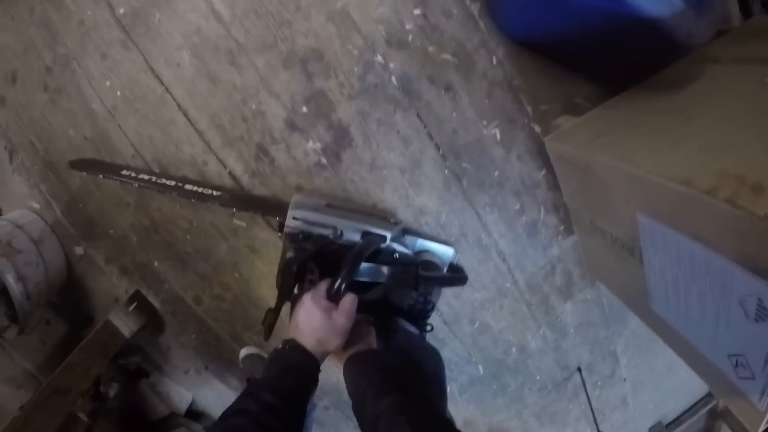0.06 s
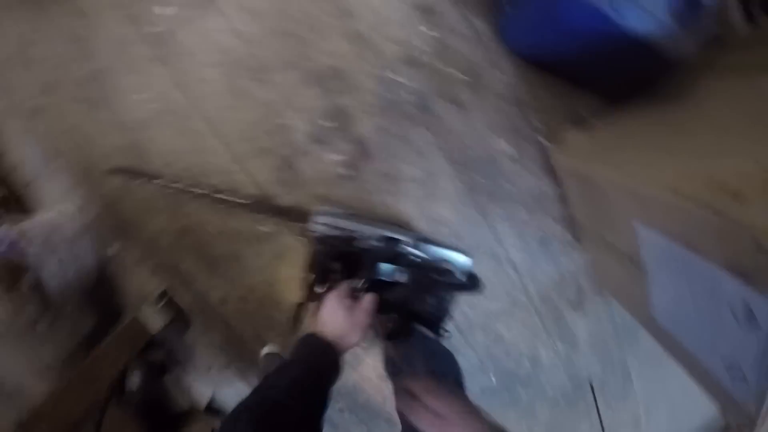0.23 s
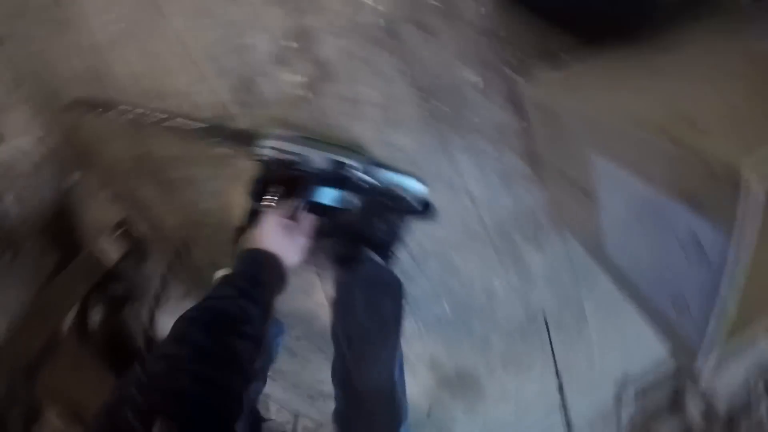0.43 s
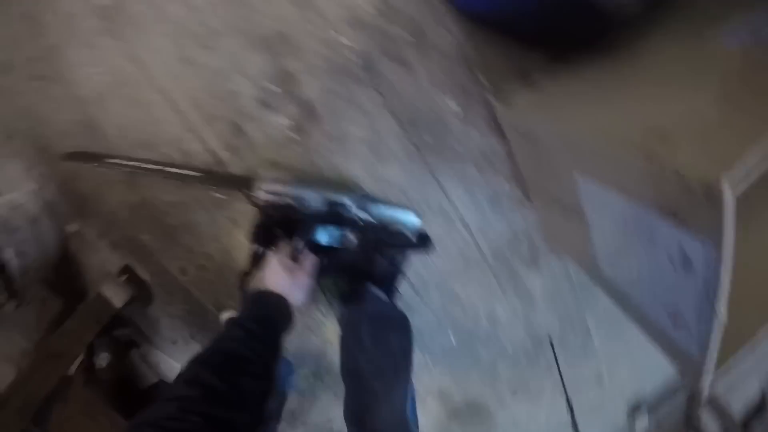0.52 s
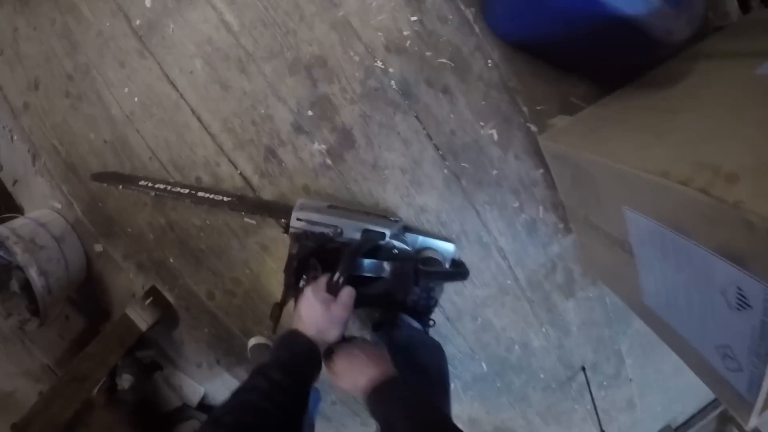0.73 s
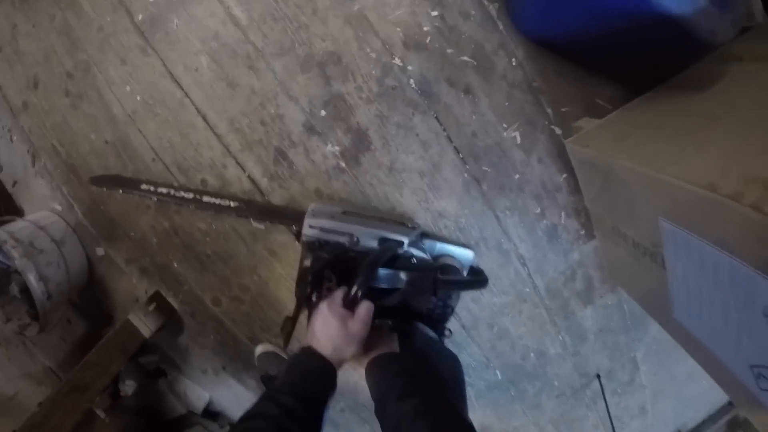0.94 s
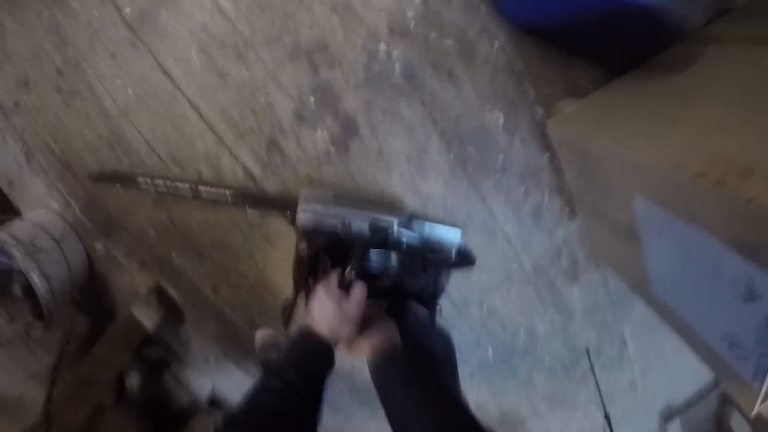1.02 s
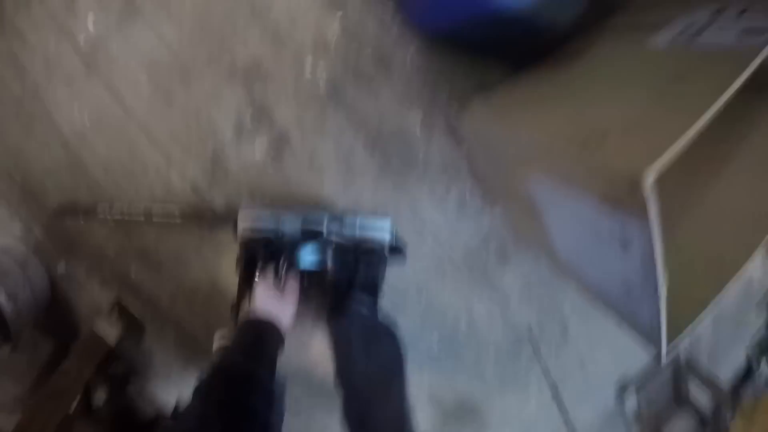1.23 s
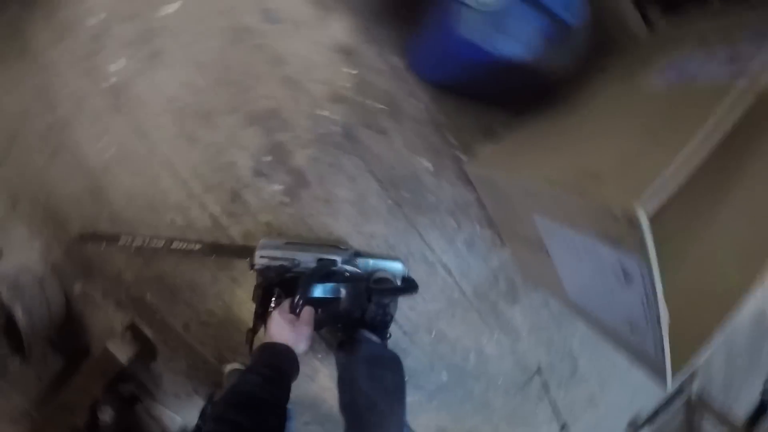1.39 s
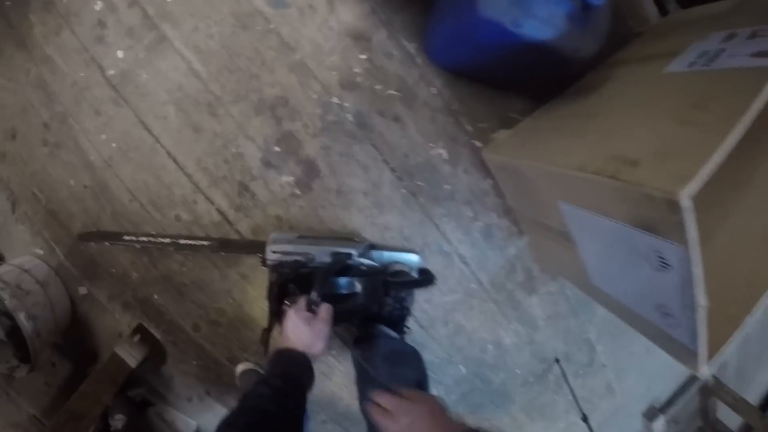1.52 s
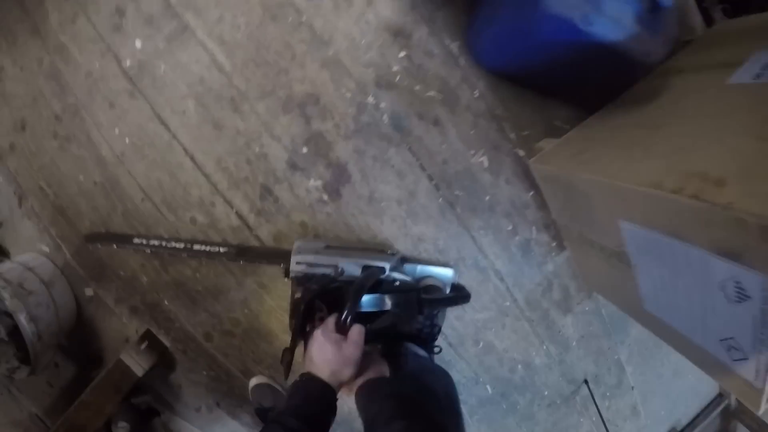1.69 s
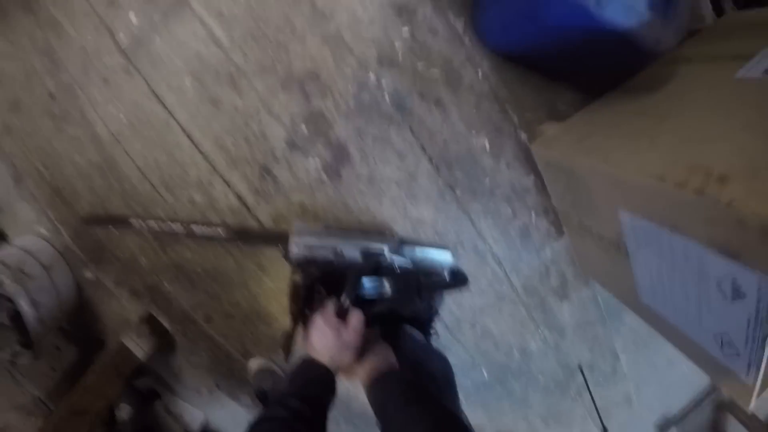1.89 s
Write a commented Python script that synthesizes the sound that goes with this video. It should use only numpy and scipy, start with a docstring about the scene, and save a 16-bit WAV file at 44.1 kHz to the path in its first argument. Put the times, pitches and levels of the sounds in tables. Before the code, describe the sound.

A chainsaw is pulled on its recoil starter and fails to catch. After faint clicks, the first pull surges at about 0.3 seconds, hollow puffs and plank boom, then sharp rattling clacks at 0.6-0.75. A quieter gap follows. The second pull starts near 1.1, chugs through 1.4, and ends in dense metallic clatter until 1.7, fading into quiet barn air. Close, with a short room tail.

```python
"""Chainsaw that will not catch

A chainsaw on a barn's plank floor is pulled twice on its recoil starter and turns over without catching.
Uneven puffs drive muffler resonances with a hiss of air; wavering notes and a rumble boom from the planks.
Starter pawls, chain and bar clack as gritty noise bursts and ring in beating steel modes as the cord
runs out and back. A tiny part jingles, the barn answers with a short tail, and quiet air lies beneath."""
import sys
import numpy as np
from scipy import signal
from scipy.fft import rfft, irfft, next_fast_len
from scipy.io import wavfile
from scipy.ndimage import uniform_filter1d, map_coordinates

SR = 44100
rng = np.random.default_rng(int(sys.argv[2]) if len(sys.argv) > 2 else 0)


def to_wav(sig):
    """Store sig (one row per channel, or 1-D mono) as 16-bit WAV at the path in sys.argv[1].

    Samples outside -1..1 are clipped; the rate is SR.
    """
    pcm = np.clip(np.atleast_2d(sig), -1, 1) * 32767
    pcm = np.round(pcm).astype(np.int16)
    wavfile.write(sys.argv[1], SR, pcm.T)  # frames by channels


N = 85995

# Resonances of the muffler and case. Each row: centre in Hz, width in Hz, relative level in dB.
MUFFLER = [(431, 33.5, -5.5), (511.2, 17.2, -1), (552.7, 25.3, -2), (617, 30.6, -3.5), (667.5, 31.7, -3),
           (742.5, 87, -12), (858, 26, -15.5), (1074, 180, -23.5)]
# Clacks of pawls, chain and bar. Each row: start in seconds, level in dB, case knock over the rattle in dB,
# treble over the rattle in dB, rattle t60 in seconds, rise in seconds, then the ringing of the low, middle
# and high steel modes over the clack, each in dB.
CLACKS = [(0.069, -39, 11, -28, 0.04, 0.00057, -24, -24, -25),
          (0.1969, -20, -4, -20, 0.069, 0.0028, -60, -50, -26),
          (0.2638, -41, -5, -27, 0.078, 0.0015, -32, -36, -30),
          (0.273, -31, 3, -29, 0.21, 0.0021, -26, -31, -32),
          (0.2854, -36, -3, -29, 0.034, 0.0013, -33, -37, -26),
          (0.2911, -15.5, 9.5, -36, 0.041, 0.00072, -40, -42, -38),
          (0.37, -29, -6, -23, 0.11, 0.0012, -30, -22, -19),
          (0.411, -16.5, 14.5, -29, 0.052, 0.0026, -37, -25, -23),
          (0.4646, -30, 7, -20, 0.058, 0.0022, -27, -22, -11),
          (0.5029, -15.5, 5, -16, 0.076, 0.0012, -35, -25, -20),
          (0.5694, -36, -15, -33, 0.05, 0.0018, -26, -31, -30),
          (0.629, -8.5, -18, -25, 0.055, 0.0015, -26, -20.5, -15),
          (0.6518, -8.5, -15, -10, 0.072, 0.0017, -23, -18.5, -19),
          (0.6729, -11.5, -4.5, -16, 0.11, 0.00085, -16, -46, -21),
          (0.6962, -9.5, -4, -9, 0.038, 0.001, -37, -26, -17),
          (0.7194, -20.5, -8, -2.5, 0.069, 0.0015, -4, -24, -9),
          (0.7337, -21.5, -13, -6, 0.16, 0.001, -26, -31, -22),
          (0.9126, -35.5, 7, -33, 0.057, 0.0014, -36, -32, -32),
          (0.9467, -25, -20, -13, 0.084, 0.0013, -40, -21, -24),
          (1.0969, -12, -5, -10.5, 0.088, 0.0012, -31, -33, -19),
          (1.1777, -26, 1, -39, 0.2, 0.0013, -32, -42, -38),
          (1.2725, -20.5, -12, -32, 0.14, 0.0013, -18, -28, -29),
          (1.3143, -18.5, 8, -9, 0.047, 0.0017, -26, -20, -22),
          (1.4031, -10.5, 2, -14, 0.062, 0.0022, -18, -32, -23),
          (1.4182, -9.5, -8, -18, 0.073, 0.0011, -33, -19, -21),
          (1.4376, -7, -3, -19, 0.043, 0.0022, -18.5, -38, -21),
          (1.4562, -14.5, -3, -7, 0.083, 0.0013, -15, -31, -22),
          (1.4798, -21, -5, -20, 0.12, 0.0013, -20, -29, -26),
          (1.5474, -24.5, -27, -7, 0.049, 0.0011, -20, -9, -22),
          (1.562, -9.5, 5.5, -18, 0.053, 0.0017, -26, -20, -16),
          (1.5912, -15, 2.5, -9.5, 0.13, 0.0011, -27, -12, -31),
          (1.6193, -17, -16, -7, 0.066, 0.0012, -22, -10.5, -9),
          (1.6489, -13.5, 3, -13.5, 0.056, 0.0023, -18, -18, -16.5),
          (1.68, -21, 0, -10, 0.074, 0.002, -29, -19, -26),
          (1.8637, -34, 6, -21, 0.093, 0.0018, -34, -19, -24),
          (1.915, -40, -12, -27, 0.089, 0.0012, -17.5, -39, -31)]


def amp(db):
    """Decibels to linear gain."""
    return 10 ** (np.asarray(db) / 20)


def unit(x):
    """x scaled to rms 1."""
    return x / np.sqrt(np.mean(x ** 2) + 1e-20)


def along(points, hz):
    """Interpolate (Hz, value) points on a log frequency axis."""
    f, v = np.transpose(points)
    return np.interp(np.log(hz + 1), np.log(f + 1), v)


def curves(rows):
    """One value per sample for each column after the time."""
    s, *cols = np.transpose(rows)
    return [np.interp(np.arange(N) / SR, s, c) for c in cols]


def filtered(x, response):
    """Multiply the spectrum of x by a function of frequency."""
    m = next_fast_len(N + SR // 2)
    return irfft(rfft(x, m) * response(np.fft.rfftfreq(m, 1 / SR)), m)[..., :N]


def resonant(x, peaks):
    """Pass x through parallel resonances of (Hz, width in Hz, dB), alternating in sign."""
    def response(f):
        return sum((-1) ** k * amp(db) * 1j * f * width / (hz * hz - f * f + 1j * f * width)
                   for k, (hz, width, db) in enumerate(peaks))
    return filtered(x, response)


def noise(spectrum):
    """Coloured noise of rms 1."""
    return unit(filtered(rng.standard_normal(N), lambda hz: amp(along(spectrum, hz))))


def pulses(rate, uneven, size_db):
    """Impulses of irregular timing (scatter as a share of the beat) and size."""
    draw = rng.standard_normal((400, 2))
    beat = np.arange(len(draw)) + uneven * draw[:, 0]
    at = (beat / rate * SR).astype(int)
    keep = (at >= 0) & (at < N)
    return np.bincount(at[keep], amp(size_db * draw[keep, 1]), N)


def decay(s, t60, rise):
    """Envelope that starts at s, swells and dies, lasting a third of a second at most."""
    out, start = np.zeros(N), round(s * SR)
    t = np.arange(min(N - start, SR // 3)) / SR
    out[start:start + len(t)] = amp(-60 * t / max(t60, .005)) * (1 - np.exp(-t / rise))
    return out


def wobble(rate):
    """A smooth curve through random knots, rate a second (190 at most)."""
    return map_coordinates(rng.standard_normal(400), [np.arange(N) * min(rate, 190) / SR])


def air():
    """The quiet barn: steady coloured noise."""
    # Each row: frequency in Hz, relative density in dB per Hz.
    air_spectrum = [(88, -39), (150, 3), (243, 5), (549, -27), (858, -7), (3020, -31.5), (14300, -38),
                    (15400, -70)]
    return amp(-53) * noise(air_spectrum)


def barn(x):
    """Each frequency of the barn's answer, a burst of noise, dies at its own speed."""
    # Each row: frequency in Hz, t60 in seconds.
    barn_decay = [(300, 0.25), (2000, 0.62), (10000, 0.37)]
    hz, t, z = signal.stft(rng.standard_normal(SR // 2), SR, nperseg=256)
    fading = z * amp(-60 * t / along(barn_decay, hz)[:, None])
    tail = signal.istft(fading, SR, nperseg=256)[1]
    delayed = np.pad(x, (400, 0))  # samples
    return signal.fftconvolve(delayed, tail / np.linalg.norm(tail))[:N]


def planks():
    """The floor booms under the shaken saw: two wavering notes with a rough skirt, and a rumble."""
    # The hum of the planks. Each row: time in seconds, pitch in Hz, level in dB.
    low_note = [(0.0, 71.3, -44), (0.108, 66, -35), (0.152, 67.5, -44), (0.238, 75.8, -36),
                (0.26, 71.6, -47), (0.304, 74.7, -12.5), (0.374, 77.5, -20), (0.422, 76, -28),
                (0.482, 78.8, -21.5), (0.574, 76.25, -18.5), (0.82, 73.6, -26), (0.938, 71.3, -26.5),
                (0.982, 72.4, -48), (1.14, 72, -24), (1.162, 72.9, -24), (1.21, 73.3, -10.5),
                (1.276, 74.7, -21.5), (1.428, 74.8, -21.5), (1.536, 76.2, -47), (1.606, 78.1, -15.5),
                (1.662, 74.5, -58), (1.704, 76.4, -27), (1.84, 65.9, -26), (1.95, 67.7, -33)]
    high_note = [(0.0, 92, -20.5), (0.064, 102.6, -47), (0.178, 103.4, -42), (0.248, 111.4, -20),
                 (0.33, 127.4, -11.5), (0.358, 116.1, -17.5), (0.438, 112.6, -15.5), (0.542, 107.3, -28.5),
                 (0.58, 107.5, -13), (0.634, 104.2, -28), (0.706, 105.9, -21), (0.744, 103.6, -37),
                 (0.782, 103.8, -17.5), (0.83, 103.2, -37), (0.972, 106.2, -32), (0.998, 104.0, -47),
                 (1.102, 116.5, -58), (1.146, 127, -16), (1.184, 122.9, -12), (1.552, 110.3, -25.5),
                 (1.678, 116.1, -33), (1.726, 112, -26), (1.868, 118, -53.5), (1.95, 118, -43)]
    # Swells of the rumble. Each row: time in seconds, level in dB.
    rumble_level = [(0.0, -31), (0.032, -27), (0.162, -41), (0.26, -20), (0.33, -21), (0.384, -14.5),
                    (0.422, -15.5), (0.63, -25), (0.706, -29), (0.726, -35), (1.058, -34), (1.102, -57),
                    (1.128, -14), (1.248, -29), (1.336, -18), (1.394, -35), (1.432, -14.5), (1.46, -21.5),
                    (1.748, -32.5), (1.758, -43), (1.792, -27), (1.95, -49)]
    # Rumble resonances. Each row: centre in Hz, width in Hz, relative level in dB.
    deep = [(33.4, 5.3, 5.5), (53, 10, 0)]
    wander, fuzz_db = .7, -6  # phase wander in radians; skirt level in dB

    rumble = resonant(resonant(rng.standard_normal(N), deep), [(40.4, 30, 0)])
    out = amp(curves(rumble_level)[0]) * unit(rumble)
    for note in low_note, high_note:
        hz, level_db = curves(note)
        phase = 2 * np.pi * np.cumsum(hz) / SR + wander * wobble(11.58)
        fuzz = amp(fuzz_db) * (wobble(45.15) * np.sin(phase) + wobble(45.2) * np.cos(phase))
        out = out + amp(level_db) * unit(np.sin(phase) + fuzz)
    return out


def jingle():
    """A small loose part shivers at a very high pitch: narrow noise in short bursts."""
    # Each row: start in seconds, level in dB, t60 in seconds.
    jingles = [(0.4404, -34.5, 0.056), (0.46, -43, 0.08), (0.9538, -45, 0.11)]
    shiver = unit(resonant(rng.standard_normal(N), [(13400, 304, 0)]))  # Hz, width in Hz, dB
    return shiver * sum(amp(db - 1.5) * decay(s, t60, .002) for s, db, t60 in jingles)


def steel():
    """Every clack feeds each mode of bar and chain, a beating, wavering pair of sines."""
    # Bar and chain modes. Each row: frequency in Hz, relative level in dB, t60 in seconds.
    modes = [(3588, -4, .27), (4630, -11, .15), (6150, -5, .3), (6690, -8, .2), (9060, -11, .2),
             (9700, -15, .15), (11050, -15, .2), (11750, -18, .12), (13600, -14, .14)]
    # Borders in Hz of the low, middle and high groups of modes.
    split_hz = [4000, 8000]
    scatter_db, flicker_db = 1.5, 3  # each mode rings differently at each clack, and unsteadily
    twin_hz, wander = 18, .045  # beat rate; phase wander in radians per kHz squared

    s, db, *rest = np.transpose(CLACKS)
    groups = rest[-3:]
    luck = rng.standard_normal((len(CLACKS), len(modes)))
    t, out = np.arange(N) / SR, 0
    for (hz, level, t60), scatter in zip(modes, luck.T):
        ring_db = groups[np.searchsorted(split_hz, hz)]
        hits = np.bincount((s * SR).astype(int), amp(db + ring_db + scatter_db * scatter), N)
        # the power of successive hits adds up and dies, then each onset is softened over 200 samples
        fade = signal.lfilter([1], [1, -amp(-120 / (t60 * SR))], hits ** 2) ** .5
        swell = uniform_filter1d(fade, size=200, origin=99)
        phase = 2 * np.pi * hz * t + wander * (hz / 1000) ** 2 * wobble(60)
        twin = np.sin(phase + 2 * np.pi * twin_hz * t + wobble(6))
        pair = np.sin(phase) + .6 * twin
        out = out + amp(level + flicker_db * wobble(30)) * swell * pair
    return out


def clacks():
    """Each clack is a short gritty rattle that knocks the case and wakes its own mix of housing resonances."""
    # Spectra of the rattle and its treble. Each row: frequency in Hz, relative density in dB per Hz.
    clatter = [(530, 6), (900, 7.5), (1190, -7.5), (3350, -6), (4540, -8), (5790, -11), (6320, -11.5),
               (7200, -34), (9360, -34), (15800, -120)]
    treble = [(4000, -28), (6800, -2), (7110, -13), (9380, -7), (12600, -15), (13800, 1), (15400, -20)]
    # Housing resonances. Each row: centre in Hz, width in Hz, relative level in dB.
    housing = [(1177, 237, 1.5), (1528, 93, -8.5), (2371, 91, -4.5), (2780, 240, -4), (5720, 430, -13)]
    housing_db, mix_db = -5.5, 3.5  # housing over the rattle; scatter of its mix
    kick_db, grit_db = 14.5, 2.5  # first blow on the case; grain of the rattle

    out, knocks = np.zeros(N), np.zeros(N)
    mid, top, white = noise(clatter), noise(treble), rng.standard_normal(N)
    grain = unit(uniform_filter1d(rng.standard_normal(N), size=60))
    grit = unit(amp(grit_db * grain))
    voices = np.array([amp(db) * unit(resonant(rng.standard_normal(N), [(hz, width, 0)]))
                       for hz, width, db in housing])
    luck = rng.standard_normal((len(CLACKS), len(housing)))
    for (s, db, case_db, treble_db, t60, rise, *_), scatter in zip(CLACKS, luck):
        rattle = amp(db - 6) * decay(s, t60, max(rise, 1e-4))
        body = amp(housing_db + mix_db * scatter) @ voices
        out += rattle * (grit * (mid + amp(treble_db) * top) + body)
        knocks += amp(case_db) * rattle * white
        knocks[round(s * SR)] += amp(db + case_db + kick_db)
    return out + resonant(knocks, MUFFLER) / np.std(resonant(white, MUFFLER))


def engine():
    """The piston's uneven puffs of air sound the muffler and hiss at the ports."""
    # The engine turning over. Each row: time in seconds, muffler level in dB, low chuff over the muffler
    # in dB, air hiss over the muffler in dB.
    turn = [(0.0, -36, -11, -7.5), (0.07, -50, -40, -13.5), (0.184, -64.5, -16, -9), (0.2, -38.5, -32, -7),
            (0.244, -33.5, 5, -15), (0.304, -11, -2.5, -25.5), (0.346, -17.5, 1, -21),
            (0.466, -18.5, -4, -21.5), (0.554, -26.5, 1.5, -18), (0.574, -23.5, -10, -15),
            (0.602, -37, -7, -11), (0.63, -19, -28, -20), (0.706, -28.5, -20, -9), (0.722, -29, -7, -6),
            (0.906, -43, -19.5, -22), (0.916, -43.5, -41, -20), (1.07, -53, -39, -6.5),
            (1.108, -34.5, -24, -6), (1.14, -25.5, 4, -13), (1.178, -10.5, -22, -31), (1.21, -17, 2, -12.5),
            (1.248, -15, -1.5, -23), (1.368, -20.5, -3, -18), (1.482, -25, -6.5, -31),
            (1.498, -29, -1.5, -11), (1.552, -31, -14, -9), (1.568, -22, -27, -14),
            (1.602, -42.5, -11, 13.5), (1.624, -18, -27, -12), (1.64, -34.5, -16, -1.5),
            (1.662, -24.5, -22, -7.5), (1.7, -34, -18, -9), (1.932, -46.5, -34, -27), (1.95, -48, -2, -20)]
    # Low chuff resonances. Each row: centre in Hz, width in Hz, relative level in dB.
    chuff_peaks = [(190.6, 36, 2.5), (225.3, 32, 0), (256.4, 24, -3.5), (287.7, 34, -4.5)]
    # Spectrum of the air. Each row: frequency in Hz, relative density in dB per Hz.
    hiss_spectrum = [(590, -44), (1000, -34), (1190, -30), (1830, -5), (2230, -4), (4690, -11.5),
                     (8890, -24.5), (13900, -33), (15400, -43)]
    beats_per_s, uneven, size_db = 88, 0.1967, 0.9  # puffs; timing scatter in beats; size scatter
    breath, puff_s = 0.43, 0.0052  # share of noise; time constant of a puff

    level_db, low_db, hiss_db = curves(turn)
    beats = pulses(beats_per_s, uneven, size_db)
    gate = unit(signal.lfilter([1], [1, -np.exp(-1 / (puff_s * SR))], beats))
    drive = (1 - breath) * unit(beats - beats.mean()) + breath * gate * rng.standard_normal(N)

    def sounded(db, peaks):
        """Resonances driven at a changing level, scaled by their answer to the steady drive."""
        return resonant(amp(db) * drive, peaks) / np.std(resonant(drive, peaks))

    puffs = sounded(level_db, MUFFLER)
    chuff = sounded(level_db + low_db, chuff_peaks)
    flutter_db = 1.9 * wobble(69.52) + 4.3 * wobble(170)
    hiss = amp(level_db + hiss_db + flutter_db) * noise(hiss_spectrum)
    return puffs + chuff + hiss


def scene():
    """The saw and the barn's answer to it, over the planks and the quiet air."""
    saw = jingle() + steel() + clacks() + engine()
    return (air() + planks() + amp(-10.5) * barn(saw) + saw)[None]


def record(dry):
    """The loudest peaks are rounded off and nothing above the band limit is kept."""
    ceiling, knee, top_hz = .95, 6, 15550  # full-scale amplitude; sharpness of the bend; band limit
    soft = dry / (1 + np.abs(dry / ceiling) ** knee) ** (1 / knee)
    return filtered(soft, lambda hz: hz < top_hz)


dry = scene()
out = record(dry)
to_wav(out)
```